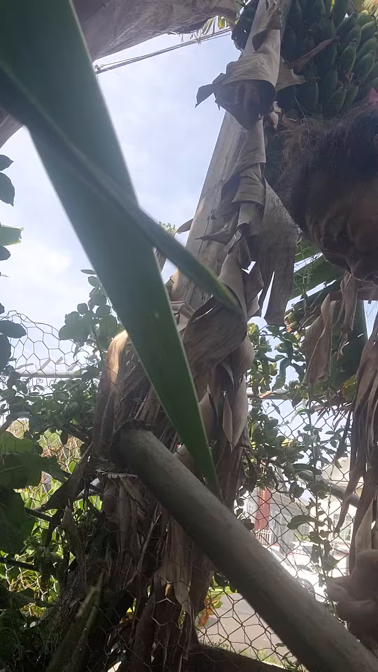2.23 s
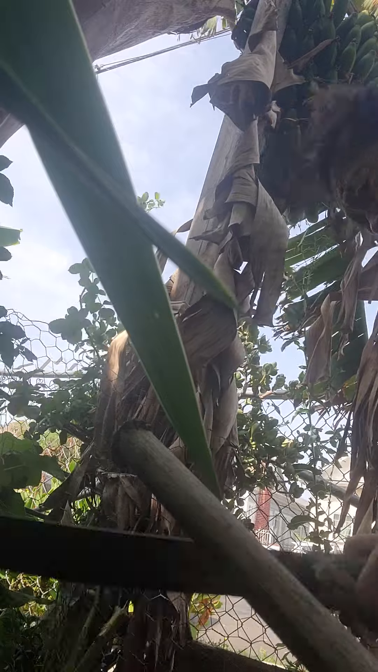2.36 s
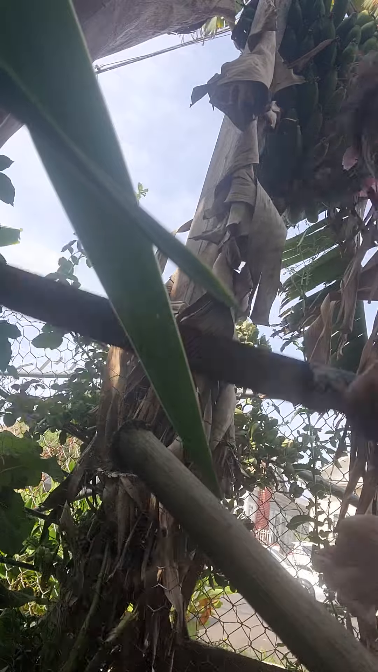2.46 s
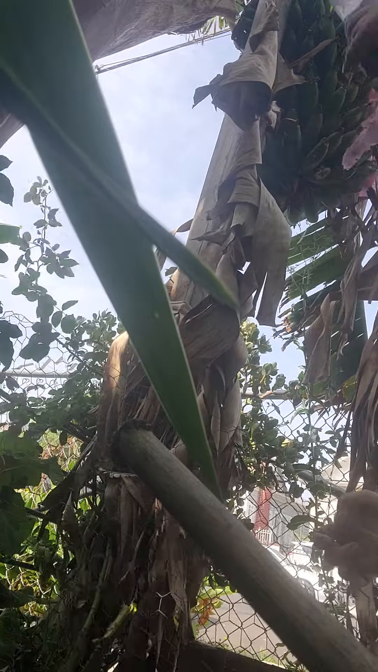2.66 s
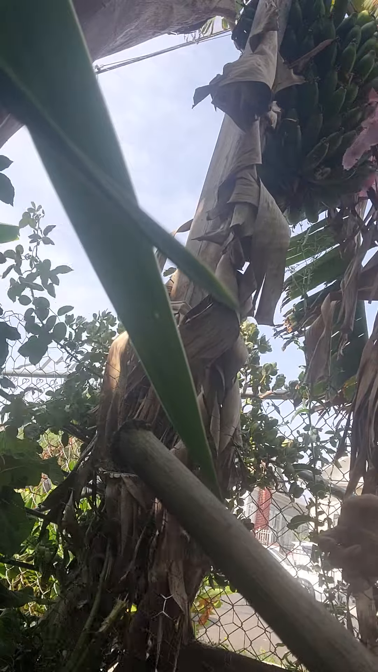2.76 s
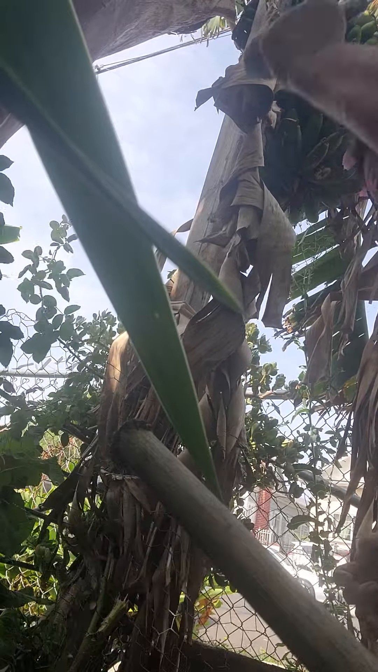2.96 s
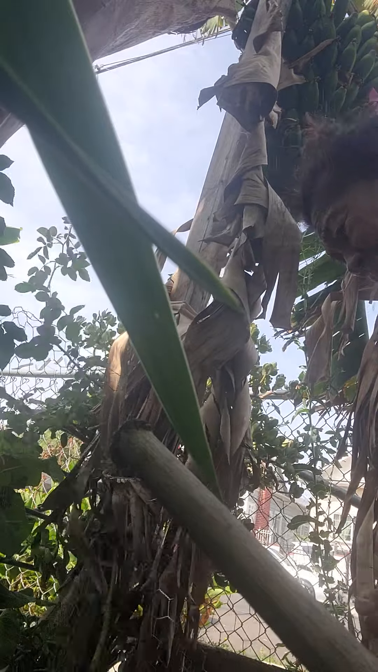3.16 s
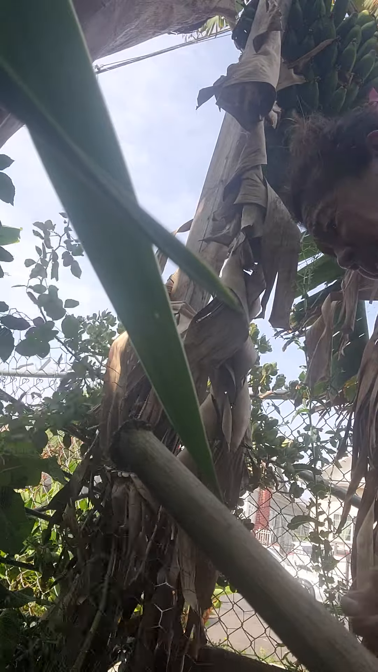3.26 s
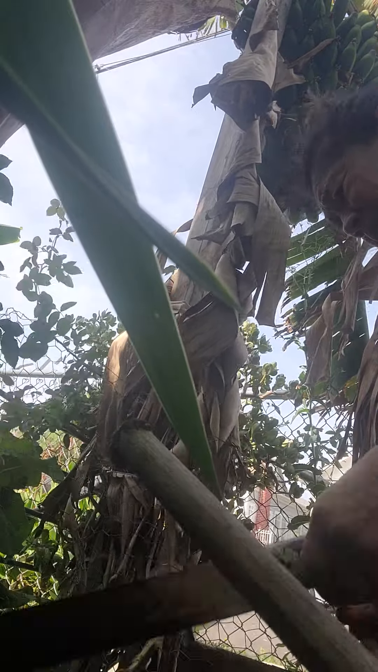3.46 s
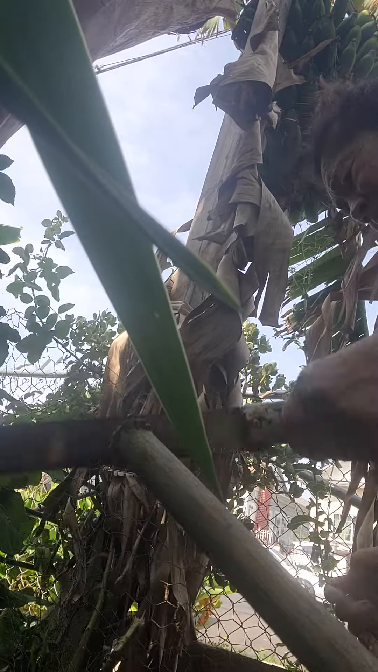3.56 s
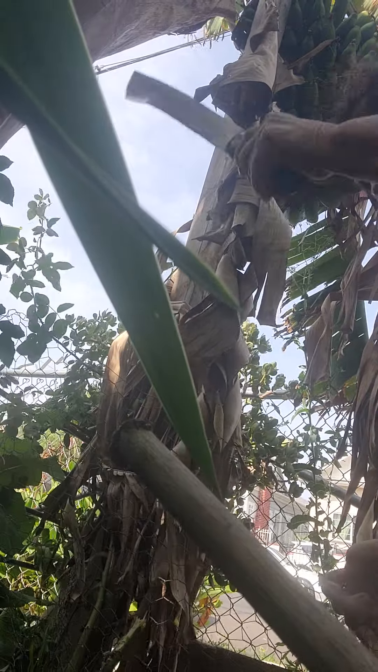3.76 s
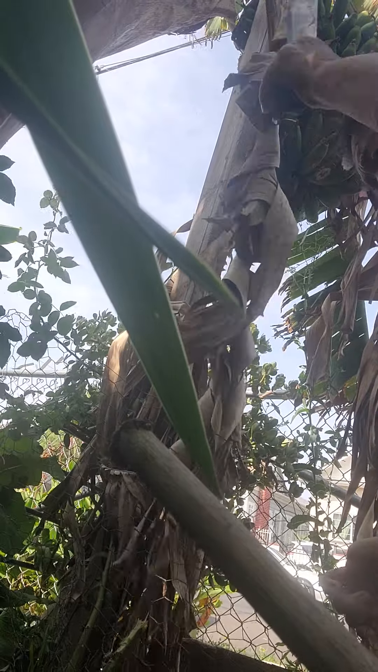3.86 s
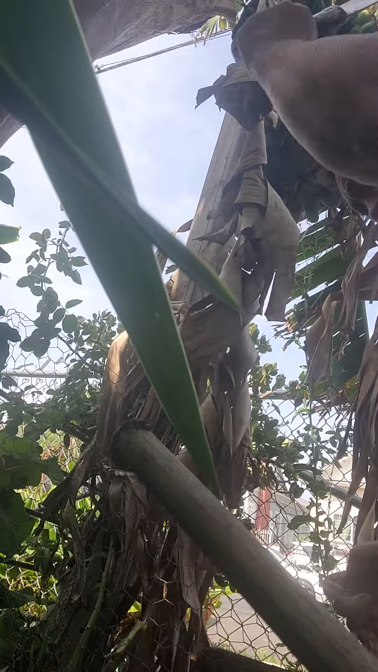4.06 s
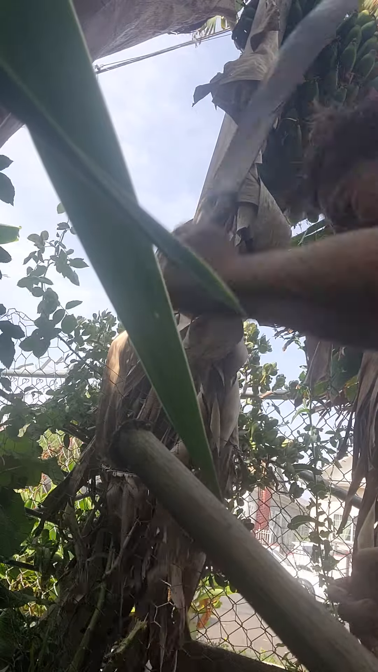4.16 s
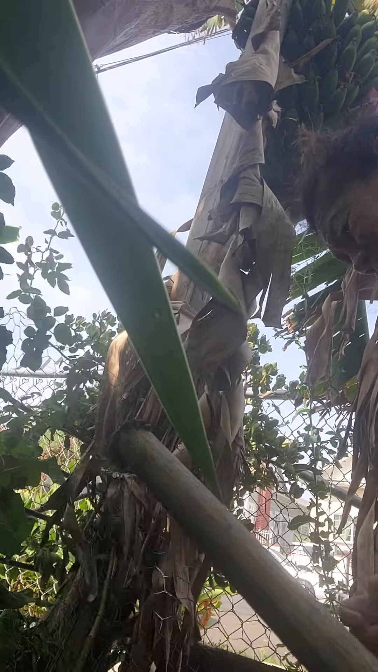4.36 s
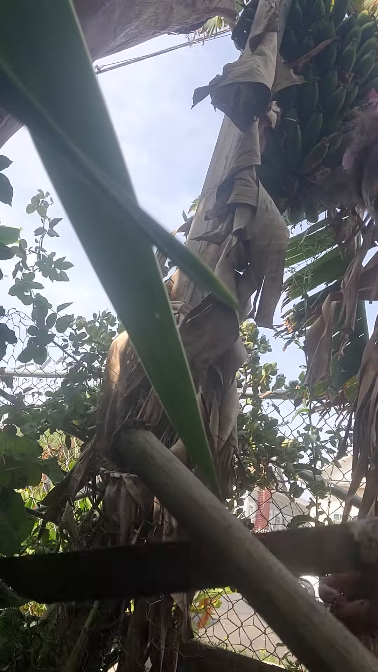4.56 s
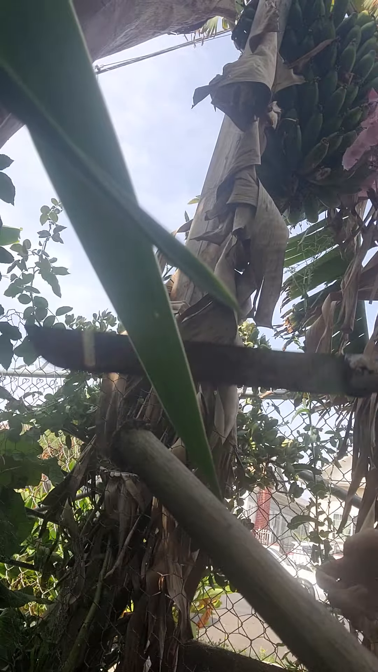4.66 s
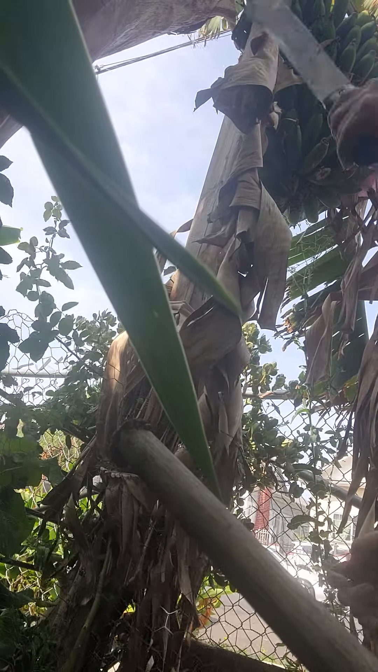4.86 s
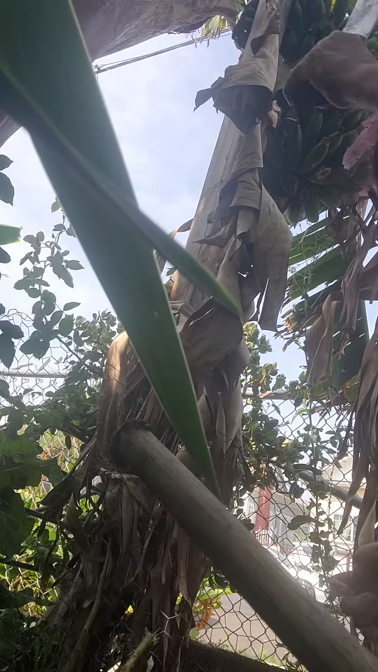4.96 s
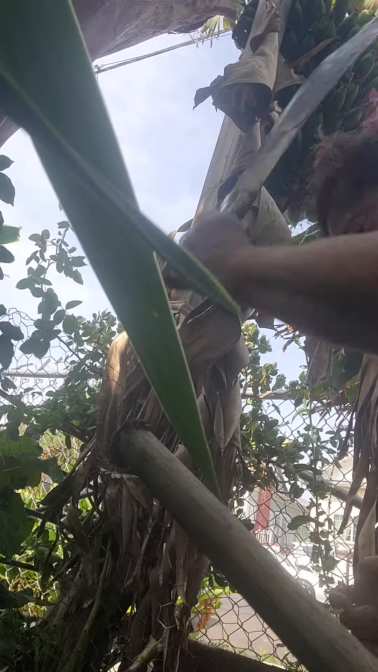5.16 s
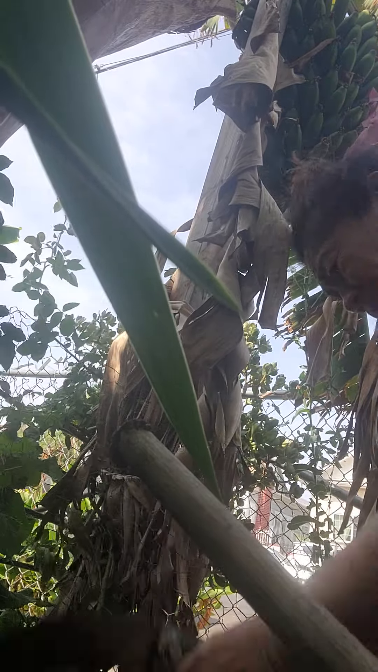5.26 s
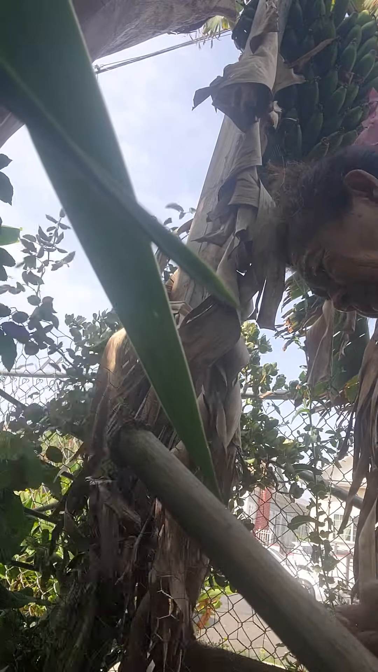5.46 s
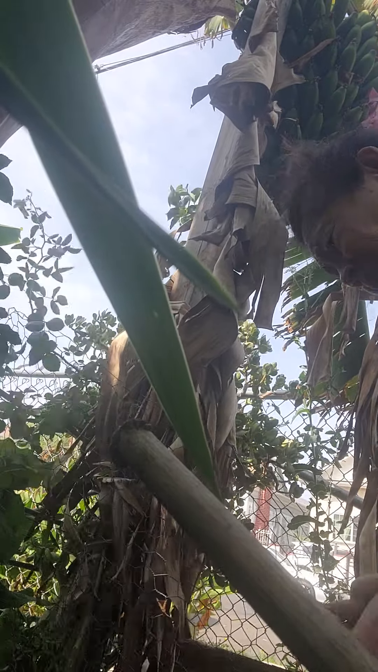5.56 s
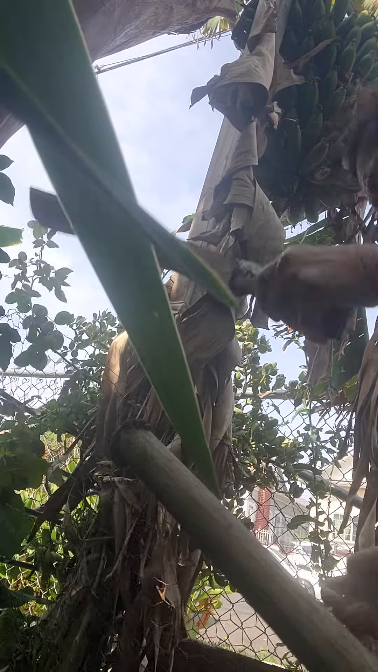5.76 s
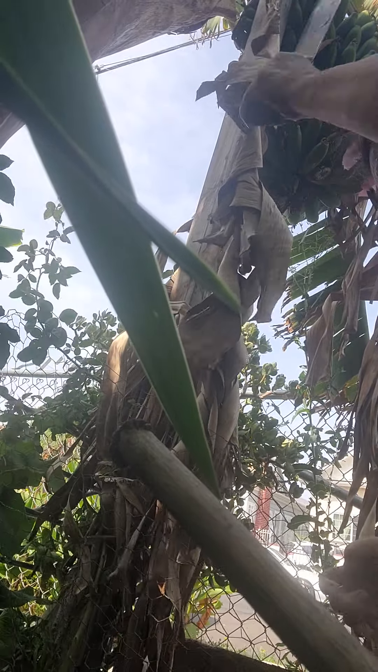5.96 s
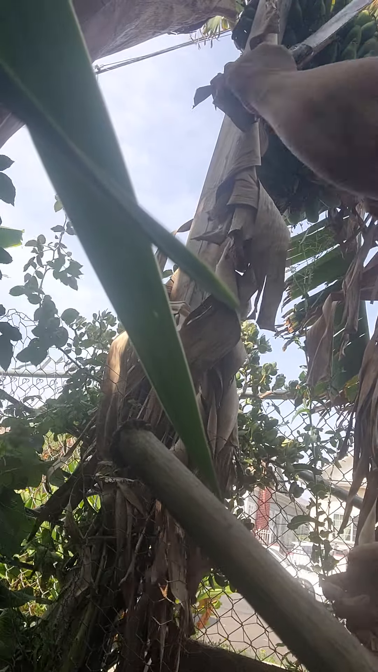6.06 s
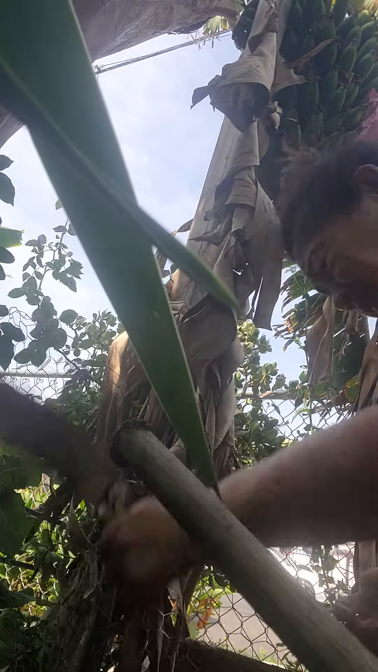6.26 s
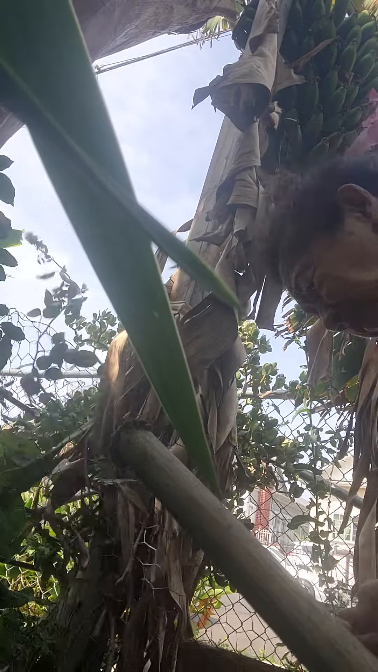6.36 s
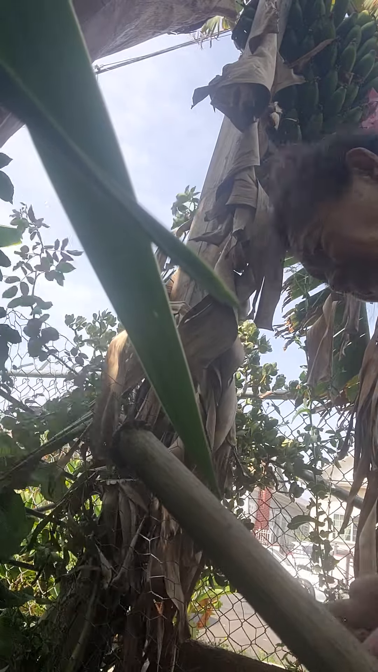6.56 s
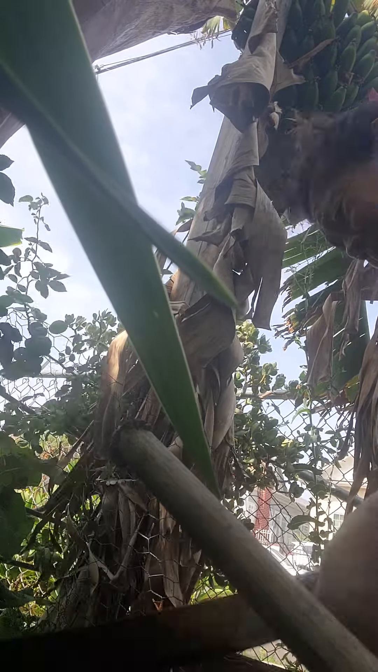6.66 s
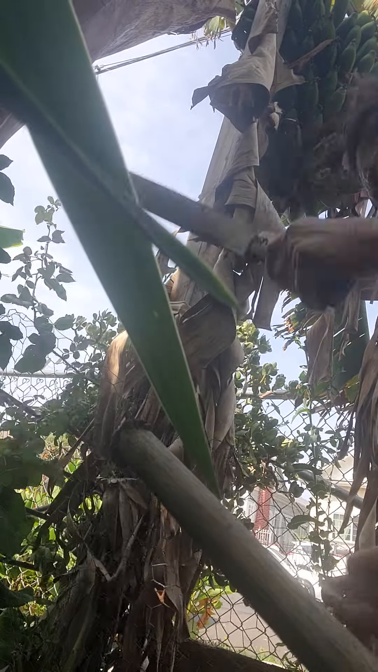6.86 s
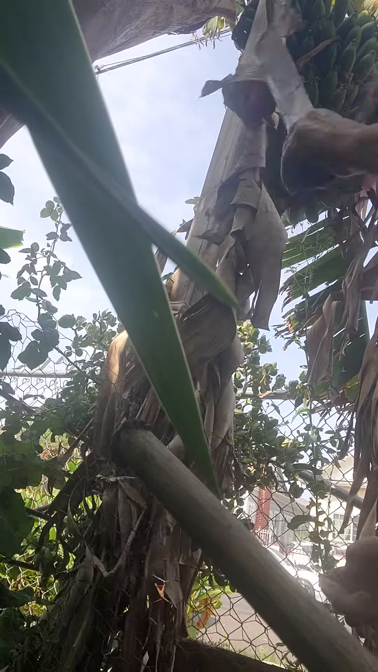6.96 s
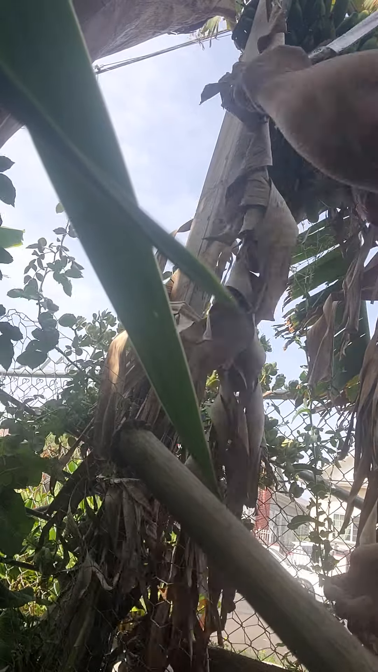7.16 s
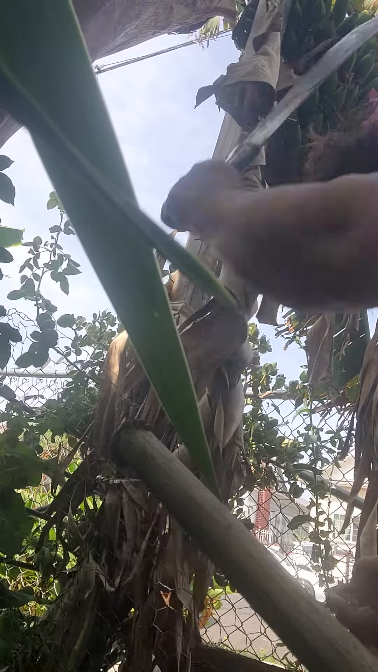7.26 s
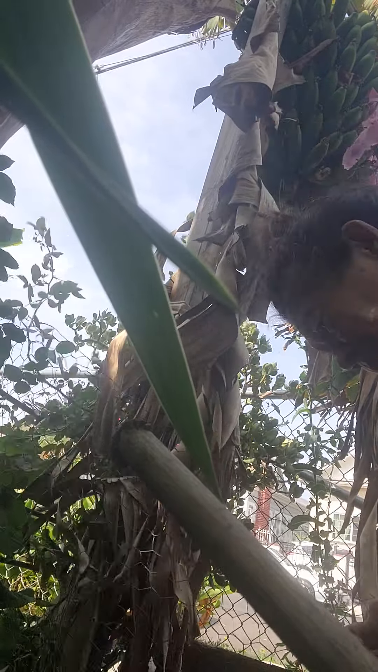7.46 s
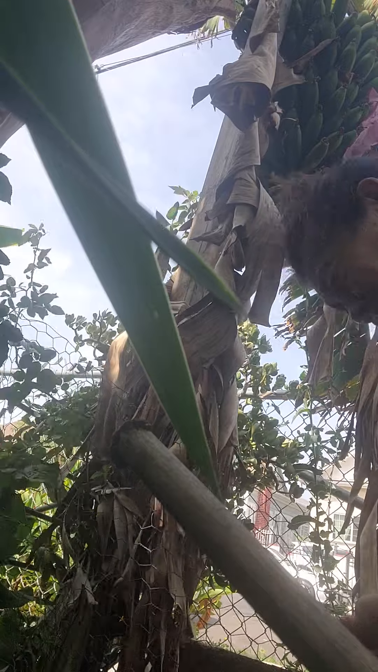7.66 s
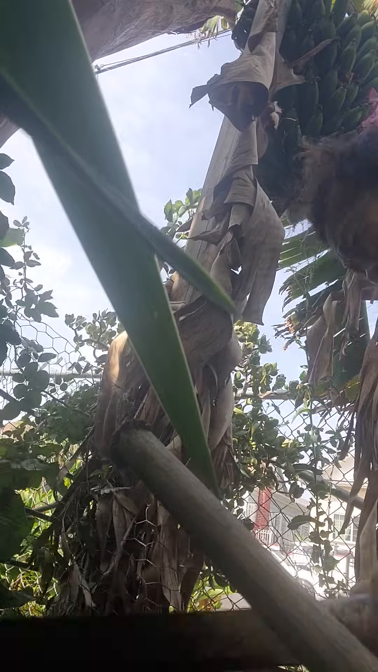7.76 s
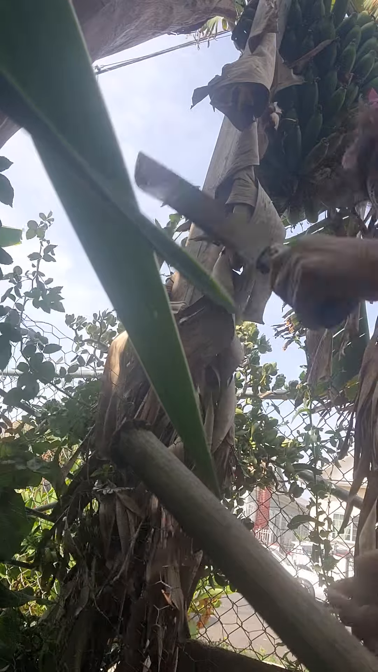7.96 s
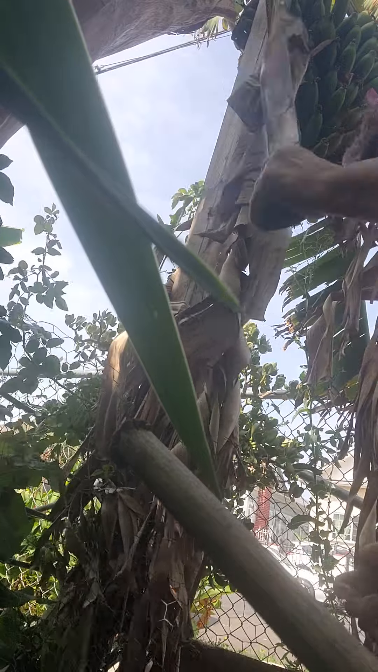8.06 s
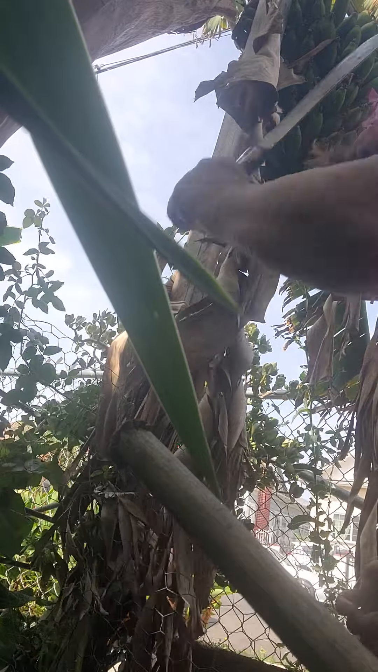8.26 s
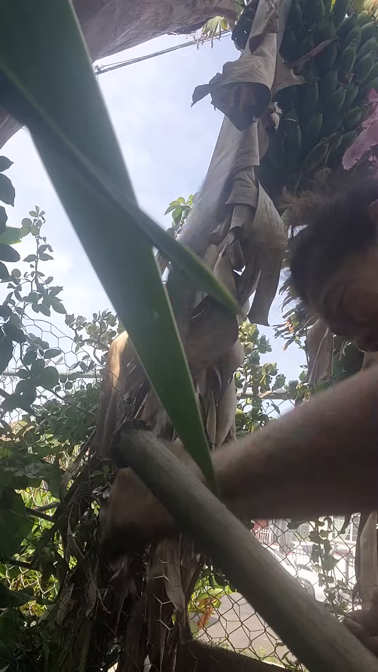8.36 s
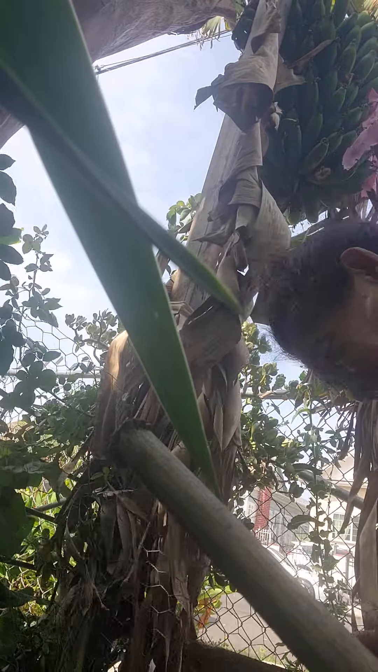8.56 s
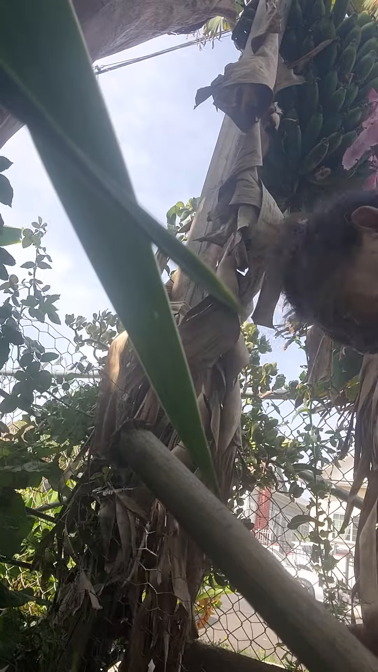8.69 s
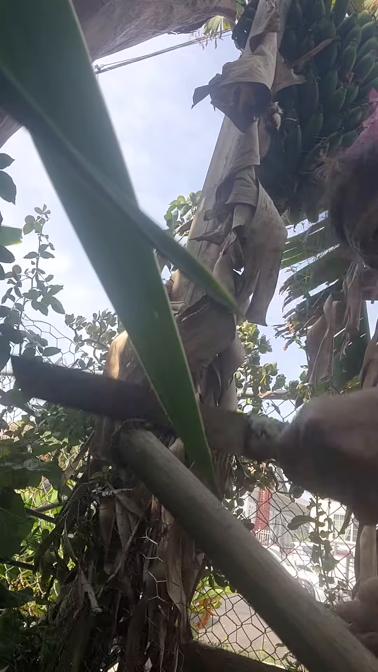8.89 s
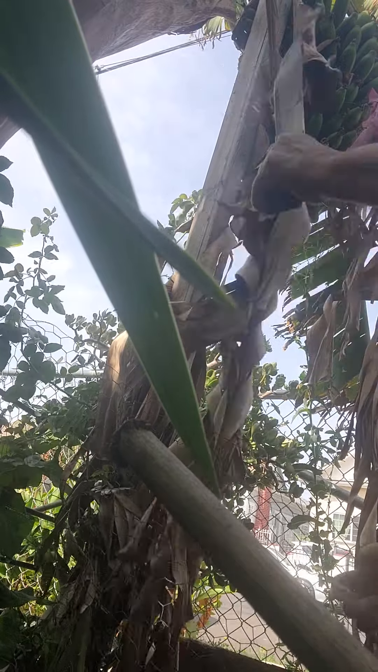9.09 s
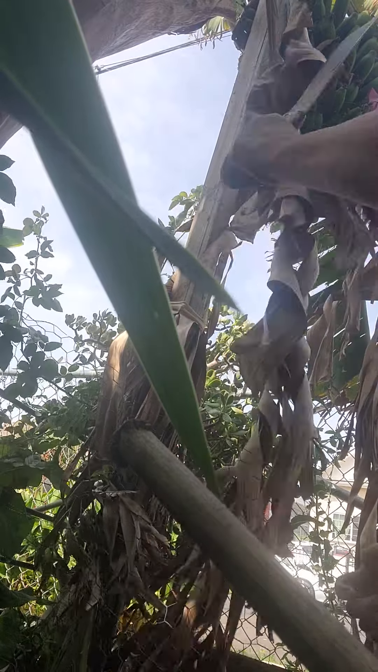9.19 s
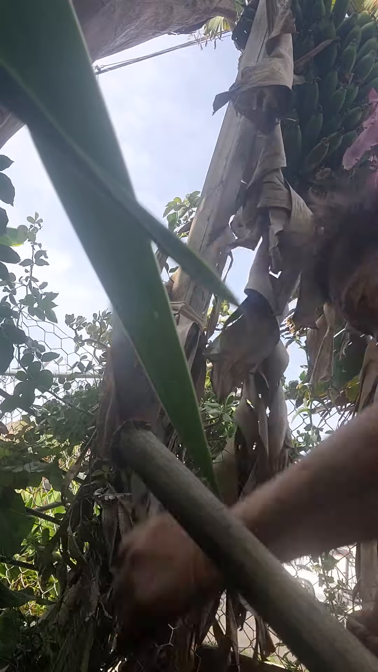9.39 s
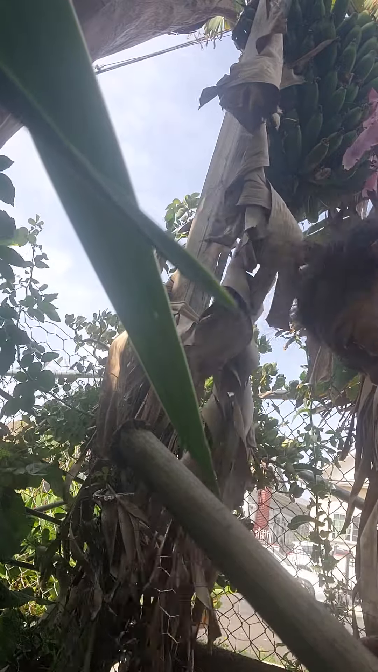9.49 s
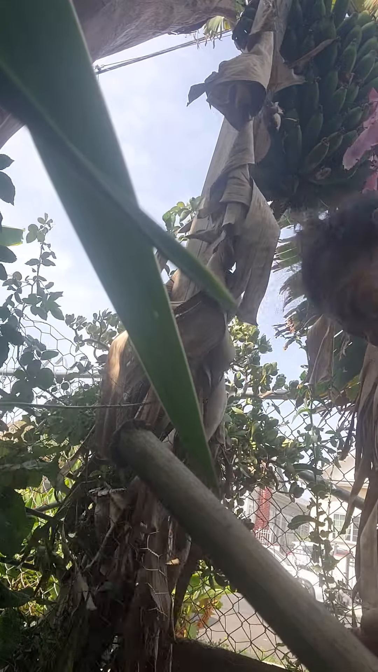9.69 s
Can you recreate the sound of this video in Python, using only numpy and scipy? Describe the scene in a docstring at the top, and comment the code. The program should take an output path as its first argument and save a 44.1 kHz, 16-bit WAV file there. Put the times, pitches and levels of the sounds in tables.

```python
"""A machete chops a fibrous stalk about once a second, close to a phone lying in dry garden leaves.
Fibres crackle as the blade bites and as it is torn free; the stalk thuds, the steel snags and chips
tick on something hard. Around the phone's two microphones the leaves rustle, mostly on the right,
and a low rumble comes from far off."""
import sys
import numpy as np
from scipy import signal
from scipy.fft import rfft, irfft
from scipy.io import wavfile
from scipy.ndimage import uniform_filter1d

SR = 44100
rng = np.random.default_rng(int(sys.argv[2]) if len(sys.argv) > 2 else 0)


def output_pcm(signal):
    """Save a mono or channel-first signal as 16-bit PCM at the path in sys.argv[1].

    Samples are clipped to [-1, 1] before scaling.
    """
    pcm = np.clip(np.atleast_2d(signal).T, -1, 1) * 32767
    wavfile.write(sys.argv[1], SR, np.round(pcm).astype(np.int16))


N = 429093

# blows of the blade: (time [s], peak [dB], mid crunch against the peak [dB], bite [s], fade t60 [s],
# thud delay [s], thud push [dB], extra push on the stalk's lowest mode [dB])
CHOPS = [(0.046, -12.5, 0, 0.0067, 0.17, .049, -27, 4), (1.05, -12, 1, 0.0078, 0.14, .023, -25, -1),
         (2.096, -14, -0.5, 0.018, 0.17, .026, -15, 5), (3.134, -13, 0, 0.019, 0.13, .015, -29.5, 15),
         (4.266, -12, -0.5, 0.026, 0.082, 0.0036, -33, 6), (5.293, -16, 1, 0.023, 0.21, 0.0046, -28, -4),
         (6.352, -14.5, 1, 0.02, 0.15, 0.00585, -20.5, 6), (7.445, -14.5, -2, 0.015, 0.14, 0.0089, -19, 9),
         (8.47, -14, -1, 0.019, 0.16, 0.012, -12.5, 5.5), (9.486, -15.5, -1, 0.016, 0.21, 0.0086, -7.5, -2)]
# modes of the steel: (frequency [Hz], level [dB], t60 [s])
BLADE_MODES = [(1870, -39, .05), (2000, -37, .05), (2160, -38, .05), (3060, -32, .03), (3480, -33, .03)]
# spectrum of tearing fibres: (frequency [Hz], level [dB])
TEAR_SPECTRUM = [(120, -24), (200, -12), (293, -6), (545, -13.5), (716, -16.5), (844, -11.5), (1950, -1.5),
                 (2260, -12.5), (3020, -5), (4120, -13), (7520, -16), (11700, -13.5), (15600, -23.5)]


def chops():
    """Thousands of fibres snap under the edge, the crunch swelling as it sinks; the steel rings faintly."""
    # spectrum of the bite: (frequency [Hz], level [dB])
    bite_spectrum = [(41, -64), (70, -2), (212, -3.5), (468, -12), (574, -4.5), (1130, -6), (1950, -2),
                     (2390, -1), (2990, 4), (5900, -4), (7390, -7.5), (11400, -2), (15600, -10.5)]
    low_db, hollow_db, treble_db, pan_db = -4.5, -4.5, 4.5, -0.7
    snaps = crackle(rate=.5, spread_db=3, cycles=9, lag_s=.0001, roam_s=.00008, lumps_db=1)
    bites = [(s, db + crunch_db, low_db - crunch_db, hollow_db, treble_db - crunch_db, pan_db, hold, t60)
             for s, db, crunch_db, hold, t60, *_ in CHOPS]
    envelopes = bursts(bites, crest_db=6.95, rise_s=.0015, sag_db=(3.5, -4, -6.5, -3.5),
                       fade=(.64, .93, .82, .94), lean=(2.7, 3, 4.6, 2.7), tail_db=-16)
    steel = ring(snaps * envelopes[2], BLADE_MODES)  # driven by the bright band's envelope
    return banded(snaps, envelopes, bite_spectrum) + steel


def tears():
    """Sparser snapping, to the right of the phone, as the blade is worked loose."""
    # fibres and dry sheaths tearing: (time [s], peak [dB], depth [dB], treble [dB], fade t60 [s])
    rips = [(0.139, -32, 4, 0, 0.23), (0.214, -28, 2, -18, 0.1), (0.602, -26, 0, 1, 0.16),
            (0.618, -13, -4.5, 0.5, 0.056), (0.651, -20, 7, -11.5, 0.13), (0.665, -20, 4, -3.5, 0.2),
            (0.712, -25.5, -11, -2, 0.31), (1.018, -19, 0.5, 0.5, 0.13), (1.16, -29.5, 3, 3.5, 0.27),
            (1.88, -23.5, -0.5, -7, 0.041), (3.07, -39.5, -4, 5, 0.27), (3.831, -15.5, 1.5, -4, 0.24),
            (3.949, -29.5, -3, -3, 0.35), (4.021, -21, -7, -6, 0.05), (5.929, -15.5, 0, -2, 0.12),
            (6.31, -24, 2, -1.5, 0.14), (6.391, -4, -12, -3.5, 0.046), (6.721, -29.5, -3.5, -2, 0.058),
            (6.946, -16, -2.5, -1.5, 0.28), (6.979, -9.5, 2, -10, 0.1), (7.008, -18.5, 0.5, -5, 0.15),
            (7.097, -25.5, -3, -5, 0.24), (7.149, -24.5, -2.5, -5, 0.11), (7.607, -27.5, 1, 6, 0.029),
            (8.023, -21, -2, 0.5, 0.29), (8.07, -20.5, 1, -3, 0.24), (8.124, -23, 4, 5.5, 0.058),
            (8.156, -30, 7.5, -2.5, 0.08), (8.191, -28.5, 0, -5.5, 0.21), (8.543, -17.5, 1, -1.5, 0.06),
            (8.627, -24.5, 5, -15, 0.055), (9.055, -18, 2.5, -3, 0.29), (9.085, -13, 3, -15, 0.14),
            (9.109, -19.5, 1.5, -3, 0.31), (9.261, -25, 1.5, -3, 0.18)]
    pan_db, hold_share = -4, .1
    events = [(s, db, -20 + 2.04 * depth_db, -2.5 + depth_db, treble_db, pan_db, hold_share * t60, t60)
              for s, db, depth_db, treble_db, t60 in rips]
    envelopes = bursts(events, crest_db=8.13, rise_s=.0013, sag_db=(4.7, .5, .3, .86),
                       fade=(.9, 1.27, .96, .9), lean=(.38, 1.15, 1.43, 1.02), tail_db=-11)
    snaps = crackle(rate=.3, spread_db=3, cycles=9, lag_s=-.0002, roam_s=.00008, lumps_db=1)
    return banded(snaps, envelopes, TEAR_SPECTRUM)


def thuds():
    """A soft push swings the wet stalk as the blade stops; a deeper blow stirs its lowest mode more."""
    # modes of the stalk: (frequency [Hz], level [dB], t60 [s])
    stalk_modes = [(107.5, -8.5, 0.087), (219, 3, 0.032), (303, -7, 0.02)]
    push = np.zeros((2, N))  # on the lowest mode, on the others
    for s, *_, delay, db, depth_db in CHOPS:
        push[:, int((s + delay) * SR)] = undb([db + depth_db, db])
    swing = ring(push[0], stalk_modes[:1]) + ring(push[1], stalk_modes[1:])
    soft_contact = np.hanning(90) / 45
    return np.convolve(swing, soft_contact)[:N] * undb([[-.4], [.4]])


def snags():
    """A short scrape near the edge rings the upper modes of the steel, on the right."""
    # the blade snagging as it comes free: (time [s], push [dB])
    catches = [(3.835, -5), (5.931, 0.5), (5.955, -8), (7.153, -18)]
    push, t = np.zeros(N), np.arange(400) / SR
    for s, db in catches:
        push[int(s * SR):][:len(t)] = undb(db) * rng.standard_normal(len(t)) * np.exp(-t / .0053)
    steel = ring(push, BLADE_MODES[3:])
    return np.array([steel * undb(-2.6), np.roll(steel, 9) * undb(2.6)])


def ticks():
    """One firm contact and a scatter of small ones ring a hard body, a little differently for each chip."""
    # chips landing: (time [s], relative level [dB])
    chips = [(0.264, -39), (0.296, -34), (0.569, -33.5), (1.208, -14), (1.274, -9.5), (1.357, -17.5),
             (1.491, -29), (2.267, -18), (2.328, -21.5), (3.535, -31), (3.641, -35.5), (3.984, -27),
             (4.083, -24), (4.423, -15), (5.027, -25), (5.47, -16), (8.679, -26.5), (8.836, -24),
             (9.529, 1), (9.591, -6.5)]
    # modes of the hard body: (frequency [Hz], level [dB], t60 [s])
    hard_modes = [(980, -17, 0.037), (1500, -9, 0.014), (2356, -2, 0.013), (3130, -4.5, 0.015),
                  (5070, -1, 0.0032)]
    knock, t = np.zeros(N + SR), np.arange(2000) / SR
    firm = 2 * np.sin(np.pi * np.clip(t / .0002 - 5, 0, 1))  # a 0.2 ms pulse, 1 ms in
    scatter_envelope = np.minimum(t / .001, 1) * np.exp(-t / .002) + .3 * np.exp(-t / .012)
    for s, db in chips:
        sign = 1
        for hz, mode_db, t60 in hard_modes:
            detune, strength = rng.standard_normal(2)
            mode = (hz * (1 + .061 * detune), db - 29.5 + mode_db + 3.5 * strength, t60)
            scatter = np.convolve(rng.standard_normal(len(t)), [.5, 1, .5], "same")
            sign = -sign  # neighbouring modes push the air in turn, so little bass is left
            knock[int(s * SR):][:len(t)] += sign * ring(firm + scatter_envelope * scatter, [mode])
    # the left microphone is further off: later and softer
    return np.array([np.roll(knock, 5) * undb(1), knock * undb(4.5)])[:, :N]


def splinters():
    """Lone fibres and dry sheaths snap, ever fainter, after each blow."""
    start_db, fade_t60_s = -40.5, 1.07
    snaps = crackle(rate=.02, spread_db=4, cycles=14, lag_s=-.0001, roam_s=.0002, lumps_db=3)
    envelope = undb(start_db - 60 * since_chop() / fade_t60_s)
    return colour(snaps * envelope, TEAR_SPECTRUM, lo_hz=800)


def rustle():
    """Countless small leaf contacts, mostly on the right: a slow stirring, and a shake after each blow."""
    # leaves stirring between the blows: (time [s], level [dB])
    stirring = [(0, -42.5), (0.52, -61.5), (0.8, -41), (0.95, -47.5), (1.8, -51), (2.56, -57.5),
                (2.66, -51.5), (3.1, -52.5), (3.72, -63), (4.17, -53.5), (4.55, -60.5), (4.7, -44),
                (4.86, -52), (5.0, -44.5), (5.15, -56), (5.88, -58.5), (6.08, -49), (6.2, -58),
                (6.92, -53.5), (7.3, -50.5), (7.75, -47), (7.95, -53.5), (8.3, -60), (8.44, -50.5),
                (8.95, -58.5), (9.46, -49.5)]
    # spectrum of dry leaves: (frequency [Hz], level [dB])
    leaf_spectrum = [(120, -32), (200, 0), (400, -7), (565, -6.5), (1920, 4), (2340, -4.5), (2860, 3),
                     (7250, -9), (12300, -5.5), (15600, -13.5)]
    shake_db, shake_treble_db, settle_t60_s = -43, -35, 1.44
    stir_db = np.interp(np.arange(N) / SR, *np.transpose(stirring))
    settle_db = -60 * since_chop() / settle_t60_s
    db = 20 * np.log10(np.hypot(undb(stir_db), undb(shake_db + settle_db)))
    treble_db = 20 * np.log10(np.hypot(undb(stir_db + 2.5), undb(shake_treble_db + settle_db)))
    side = np.array([[-1], [1]])
    envelopes = undb([.75 * db - 24.5 + 1.5 * side, db - 4 + 2.3 * side,
                      db + 1.5 + 2.6 * side, treble_db + 2.1 * side])
    contacts = crackle(rate=1.2, spread_db=1.6, cycles=6.2, lag_s=.00003, roam_s=.0002, lumps_db=.89)
    patches = undb(2.5 * wander(int(.04 * SR))[:N])  # leaves touch in patches
    return banded(contacts * patches, envelopes, leaf_spectrum)


def rumble():
    """Low far-off noise, nearly the same at both microphones."""
    # spectrum of the distant background: (frequency [Hz], level [dB])
    far_spectrum = [(12, -68), (20, -31), (27, -22), (40, -6.5), (60, 0), (123, -9.5), (156, -19.5),
                    (198, -21.5), (400, -21), (520, -56), (880, -120)]
    mid, side = colour(rng.standard_normal((2, N)), far_spectrum, hi_hz=300)
    return undb(-49) * np.array([.95 * mid + .3 * side, 1.05 * mid - .3 * side])


def crackle(rate, spread_db, cycles, lag_s, roam_s, lumps_db):
    """Uneven snaps in lumps, at rms 1; each pitch snaps rate * hz times a second and rings a few cycles."""
    lumps, total = wander(128), 0
    for hz in 70 * 2 ** np.arange(0, 8.2, .4):
        at = np.flatnonzero(rng.random(N - 64) < rate * hz / SR) + 32
        sign = rng.choice([-1, 1], len(at))
        size_db = spread_db * min(1, (2000 / hz) ** 1.5) * rng.exponential(size=len(at))
        size = sign * undb(size_db + lumps_db * lumps[at])
        # the spot that snaps roams, and with it the lag between the microphones
        left_lag_s = lag_s + roam_s * wander(1024)[at]
        right_lead = np.clip(np.round(left_lag_s * SR), -30, 30).astype(int)
        push = np.zeros((2, N))
        push[0, at] = size
        np.add.at(push[1], at - right_lead, size)
        grains = ring(push, [(hz, 0, cycles / hz)])
        total = total + grains * np.sqrt(hz / np.mean(grains ** 2))  # equal power per hertz: white
    return total / np.sqrt(np.mean(total ** 2))


def bursts(events, crest_db, rise_s, sag_db, fade, lean, tail_db):
    """Stereo envelopes of four bands: quick rise, a hold that sags or swells, a fade and a slower tail."""
    t, power = np.arange(SR // 2) / SR, np.zeros((len(lean), 2, N + SR))
    # per band: drop over the hold, speed of the fade, multiple of the pan
    sag_db, fade, lean = (np.reshape(v, (-1, 1, 1)) for v in (sag_db, fade, lean))
    for s, db, low_db, hollow_db, treble_db, pan_db, hold, t60 in events:
        start, hold, t60 = int(s * SR), max(hold, .001), max(t60, .01)
        level_db = db - crest_db + np.reshape([low_db, hollow_db, 0, treble_db], (-1, 1, 1))
        side_db = lean * np.array([[pan_db], [-pan_db]]) / 2
        rise = np.minimum(t / rise_s, 1) ** 2
        held = undb(level_db + side_db - sag_db * np.minimum(t / hold, 1))
        faded = fade * np.maximum(t - hold, 0) / t60
        decay_power = undb(-60 * faded) ** 2 + undb(tail_db - 20 * faded) ** 2
        power[:, :, start:start + len(t)] += (rise * held) ** 2 * decay_power
    return np.sqrt(power[:, :, :N])


def banded(snaps, envelopes, spectrum):
    """Plays the snaps in a low, a hollow, a bright and a treble band, each on its own envelope."""
    # edges of the four bands: (frequency [Hz])
    edges = (1, 800, 2000, 5000, 1e5)
    return sum(colour(snaps * env, spectrum, lo, hi) for env, lo, hi in zip(envelopes, edges, edges[1:]))


def colour(x, spectrum, lo_hz=1, hi_hz=1e5):
    """Causal filter through (Hz, dB) points between two soft edges; white noise keeps its rms."""
    size = 4096
    f = np.maximum(np.arange(size // 2 + 1), .5) * SR / size
    hz, db = np.transpose(spectrum)
    gain = undb(np.interp(np.log(f), np.log(hz), db))
    gain /= np.sqrt((1 + (lo_hz / f) ** 8) * (1 + (f / hi_hz) ** 8))
    cepstrum = irfft(np.log(gain / np.sqrt(np.mean(gain ** 2)) + 1e-5))
    cepstrum[1:size // 2] *= 2  # folded for minimum phase
    cepstrum[size // 2 + 1:] = 0
    impulse = irfft(np.exp(rfft(cepstrum)))
    return signal.oaconvolve(x, impulse[None], axes=1)[:, :N]


def ring(x, modes):
    """Sum of decaying resonances; a unit push starts each at its own level."""
    total = 0
    for hz, db, t60 in modes:
        r, w = np.exp(-np.log(1000) / (t60 * SR)), 2 * np.pi * hz / SR
        total = total + signal.lfilter([0, undb(db) * np.sin(w)], [1, -2 * r * np.cos(w), r * r], x)
    return total


def since_chop():
    """Seconds since the latest blow, counted from -1 s ahead of the first."""
    t, blows = np.arange(N) / SR, [row[0] for row in CHOPS]
    return t - np.array([-1] + blows)[np.searchsorted(blows, t)]


def wander(k):
    """Random levels held k samples and slewed."""
    return uniform_filter1d(np.repeat(rng.standard_normal(N // k + 1), k), k)


def undb(db):
    """Decibels to gain."""
    return 10 ** (np.asarray(db) / 20)


def scene():
    """The garden as it reaches the two microphones down in the leaves."""
    return chops() + tears() + snags() + ticks() + thuds() + rustle() + rumble() + splinters()


def record(dry):
    """The phone drops the deepest bass, clips at full scale and cuts the top."""
    low_cut = signal.butter(2, 28, "high", fs=SR, output="sos")
    top_cut = signal.ellip(10, .2, 70, 16050, fs=SR, output="sos")
    clipped = np.clip(signal.sosfilt(low_cut, dry), -1, 1)
    return signal.sosfilt(top_cut, clipped)


dry = scene()
out = record(dry)
output_pcm(out)
```